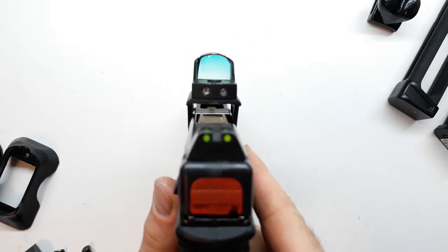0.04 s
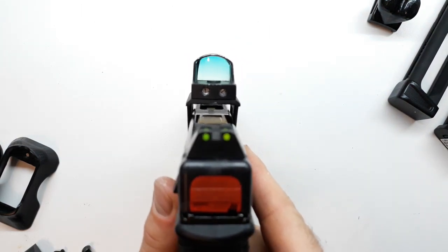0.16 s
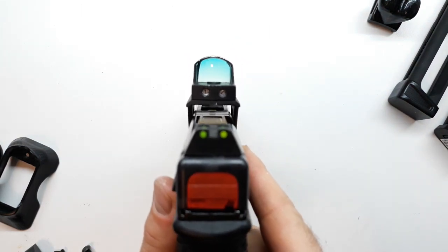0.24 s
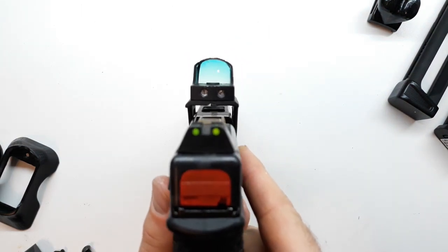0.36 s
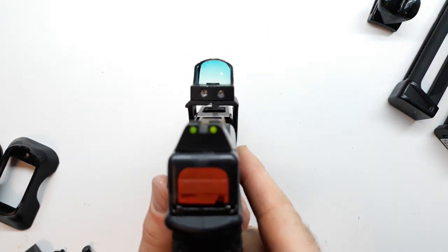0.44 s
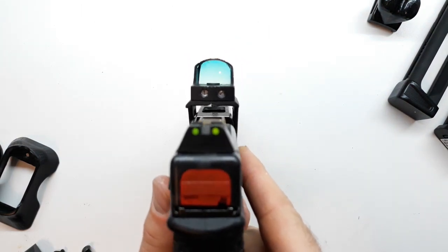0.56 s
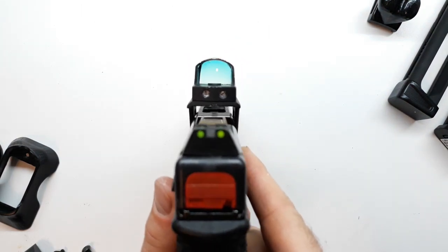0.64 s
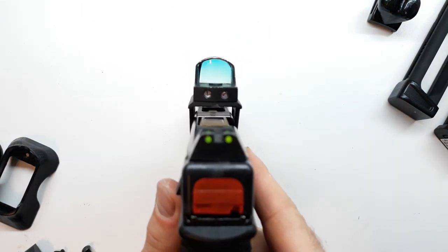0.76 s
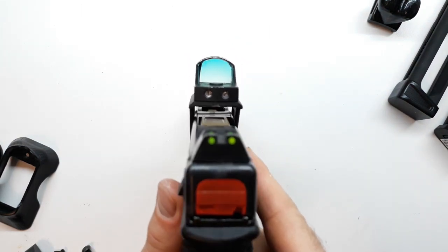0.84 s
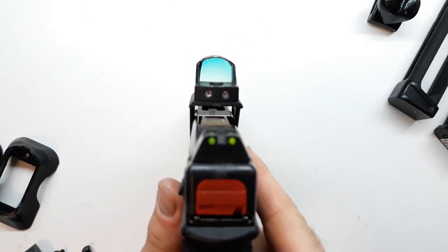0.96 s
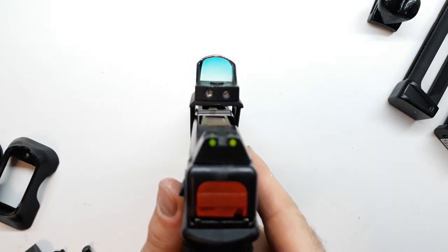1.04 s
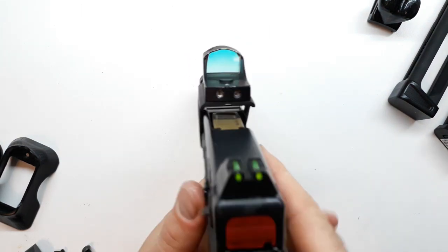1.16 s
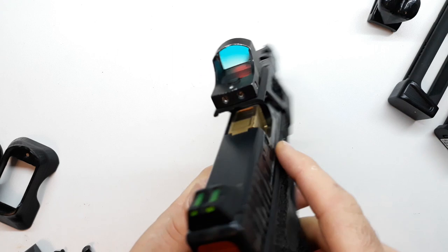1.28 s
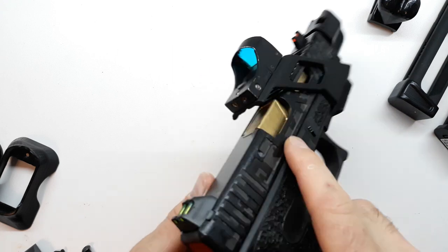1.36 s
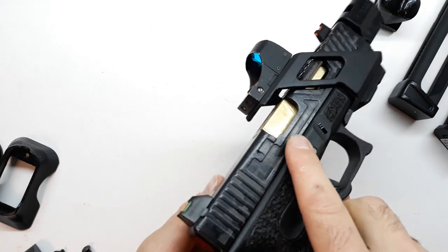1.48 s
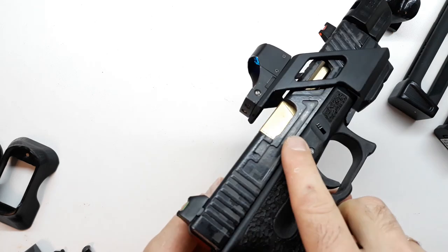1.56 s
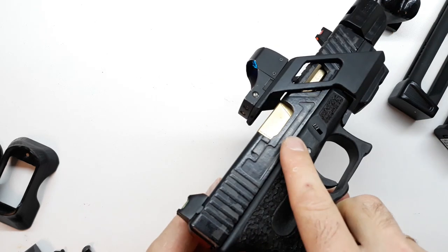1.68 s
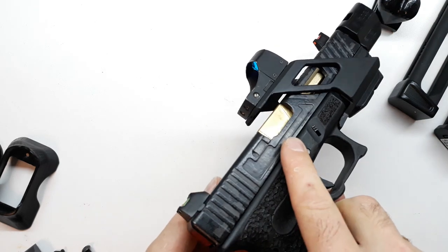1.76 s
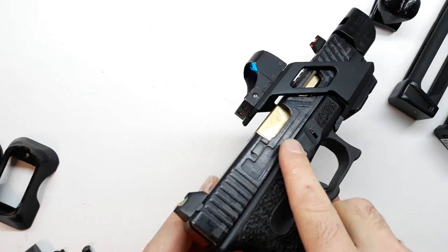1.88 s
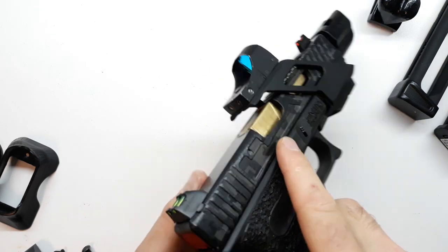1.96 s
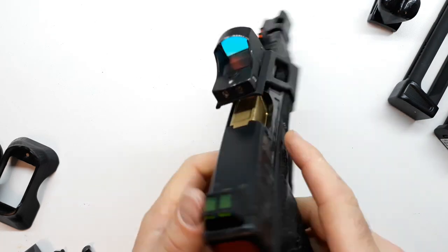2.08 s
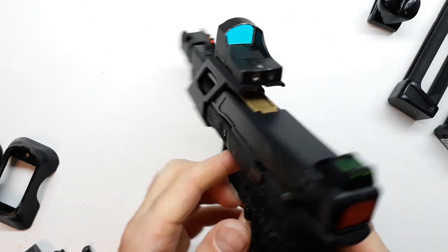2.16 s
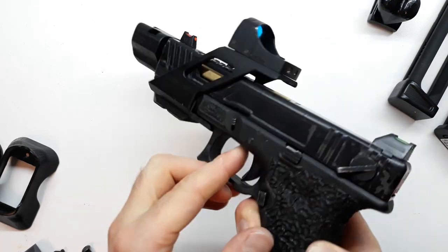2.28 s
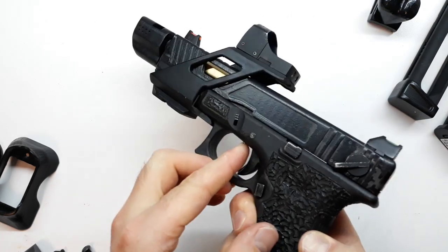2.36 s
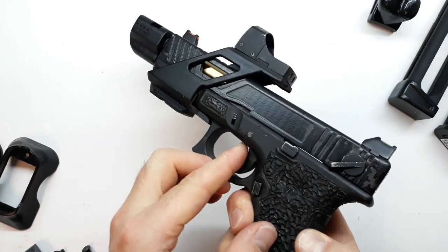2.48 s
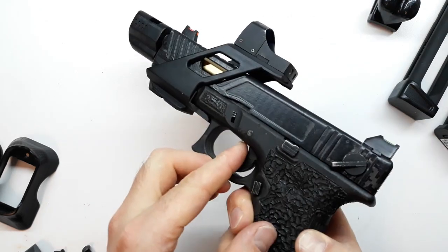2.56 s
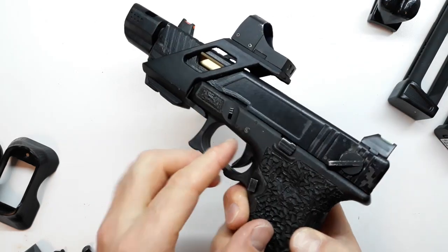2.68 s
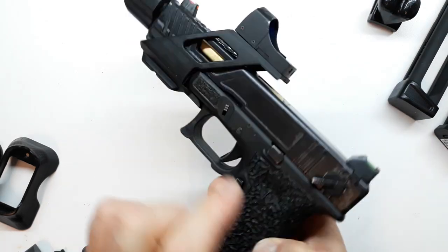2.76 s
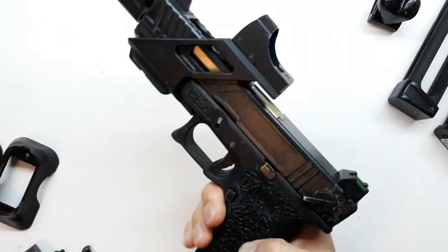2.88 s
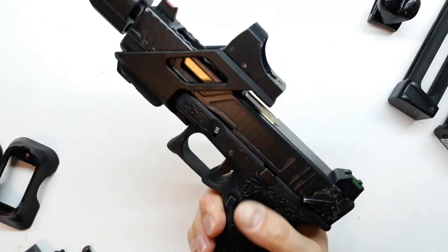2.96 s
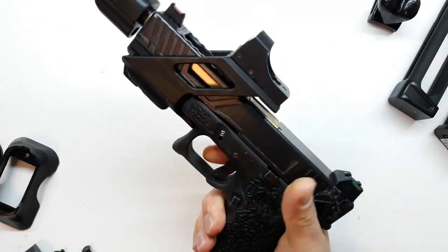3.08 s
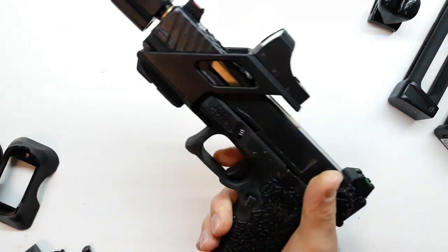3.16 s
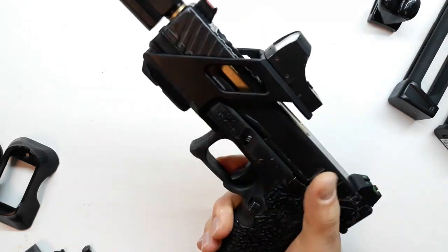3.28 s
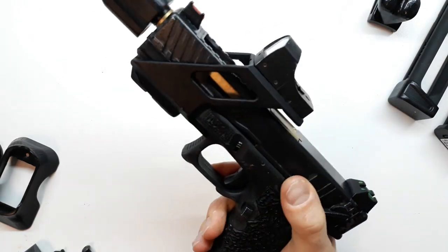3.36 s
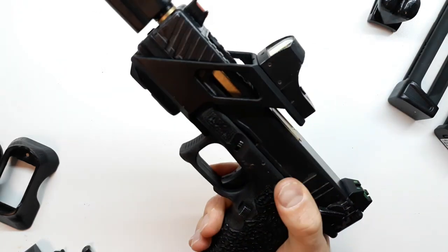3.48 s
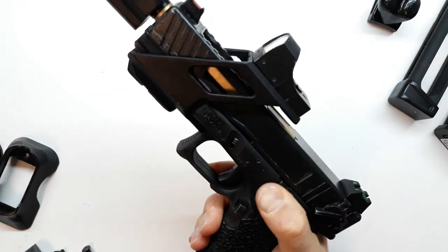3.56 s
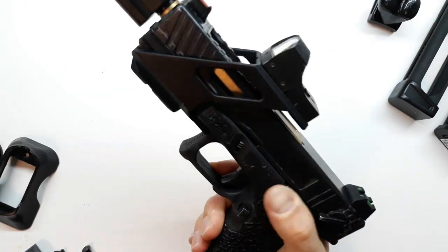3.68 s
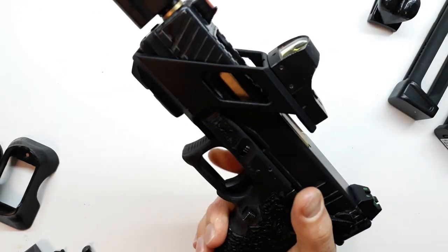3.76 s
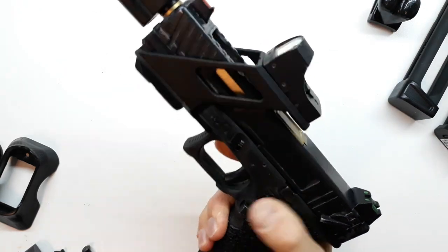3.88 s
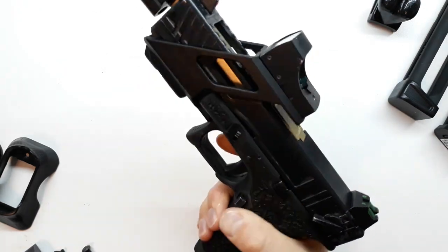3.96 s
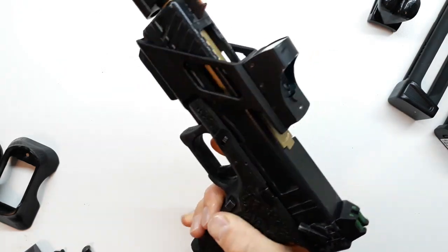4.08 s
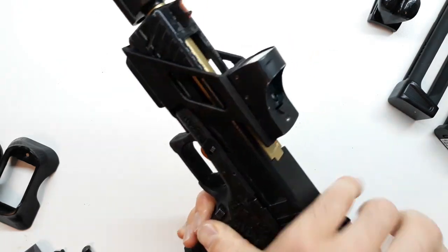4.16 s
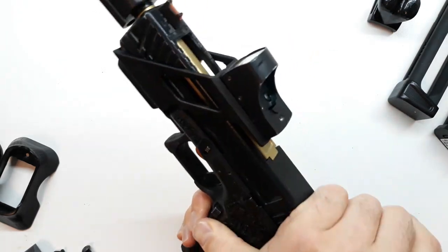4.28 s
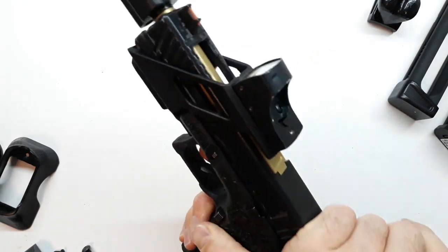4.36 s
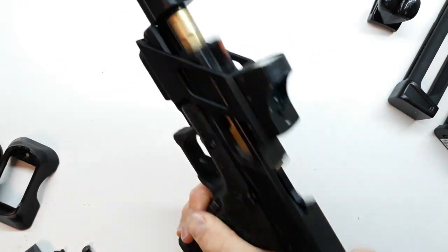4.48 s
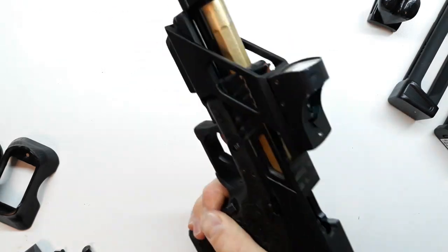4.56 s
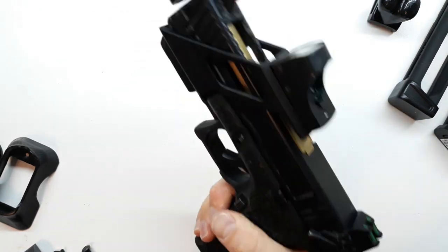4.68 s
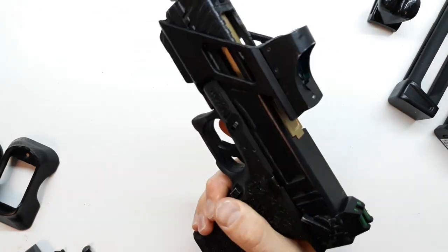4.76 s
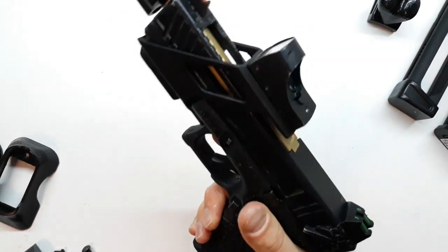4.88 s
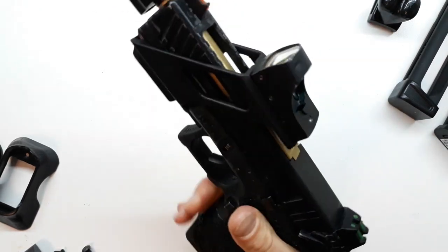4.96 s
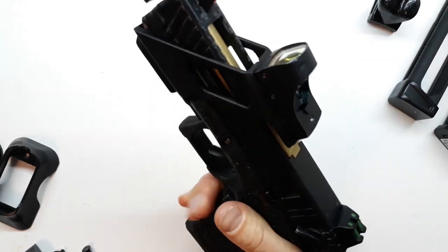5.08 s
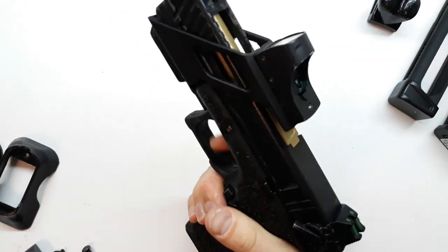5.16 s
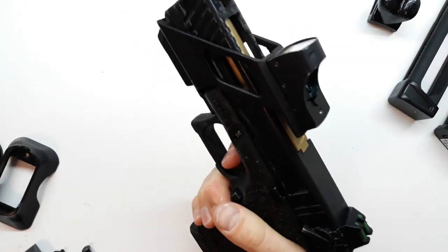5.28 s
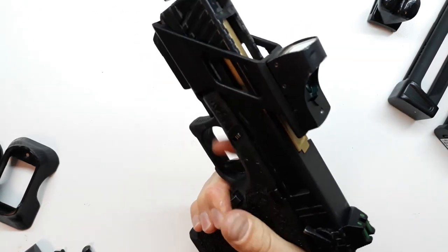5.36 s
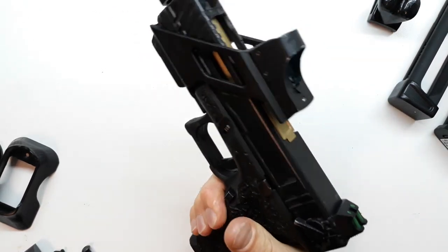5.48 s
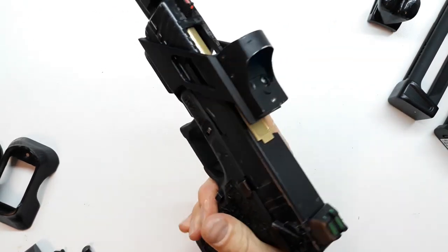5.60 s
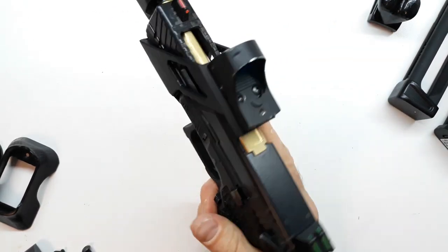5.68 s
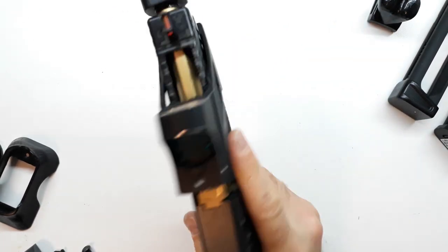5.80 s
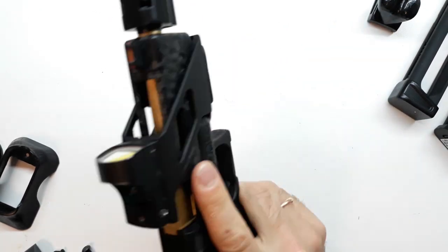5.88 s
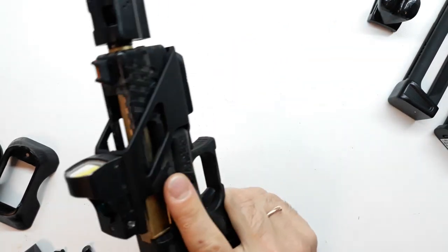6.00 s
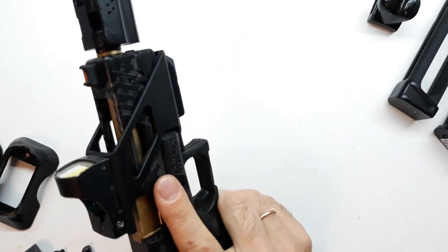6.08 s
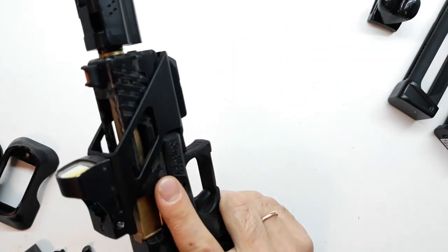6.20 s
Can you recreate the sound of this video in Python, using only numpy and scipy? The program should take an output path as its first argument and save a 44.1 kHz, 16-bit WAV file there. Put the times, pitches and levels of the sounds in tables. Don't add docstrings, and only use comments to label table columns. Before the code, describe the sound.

Close to the microphone in a bare, lively room, fingers rub and tick lightly on a pistol while a muffled engine speeds up outside over low traffic rumble and faint hiss. After four seconds the slide is racked in a very loud burst of metallic clacks, then slams home with a thump and short ringing echo. A sharp hammer click follows; the background drops lower and almost nothing else is heard.

```python
import sys
import numpy as np
from scipy import signal
from scipy.fft import rfft, irfft
from scipy.io import wavfile
from scipy.ndimage import uniform_filter1d, minimum_filter1d

SR = 44100
rng = np.random.default_rng(int(sys.argv[2]) if len(sys.argv) > 2 else 0)


def gain_from_decibels(decibels):
    exponent = np.asarray(decibels, float) / 20
    return 10 ** exponent


def inscribe(sig):
    pcm = np.round(np.clip(np.atleast_2d(sig).T, -1, 1) * 32767)
    wavfile.write(sys.argv[1], SR, pcm.astype(np.int16))


N = 274743

# (time [s], firing rate [Hz])
FIRING_RATE = [
    (0, 77),
    (2.2, 88.6),
    (3, 92.8),
    (3.4, 94.7),
    (4.2, 96.8),
    (5, 99.3),
    (6.23, 101.6),
]
# (time [s], load [dB])
ENGINE_LOAD = [
    (0, -24.5),
    (1.8, -19),
    (3.05, -18),
    (3.15, -3),
    (3.45, -2),
    (3.8, 1),
    (4.38, -2),
    (5.2, -5),
    (5.6, -14.5),
    (6.23, -13.5),
]
# (multiple of firing rate, level at full load and cruising speed [dB],
# share of the load's swing, gain with firing rate [dB/Hz])
ENGINE_ORDERS = [
    (1, -61.5, .05, 0.7),
    (2, -41.5, 1.15, -0.28),
    (3, -59.5, 2.5, 3.6),
    (4, -69.5, 0.9, 0.65),
]
# (time [s], level [dB], length [s])
UPPER_SWELLS = [(0.42, -57.5, 0.15), (0.682, -45, 0.086), (0.94, -43.5, 0.25), (1.093, -36, 0.12),
                (1.262, -40.5, 0.14), (1.444, -45, 0.047), (1.567, -46, 0.03), (1.72, -48, 0.12),
                (1.884, -43, 0.15), (2.015, -43, 0.087), (2.142, -38, 0.11), (2.292, -42.5, 0.066),
                (2.417, -41.5, 0.077), (2.568, -47.5, .065), (2.747, -46, 0.058), (2.984, -45, 0.18),
                (3.224, -46, 0.078), (3.396, -57, .1), (3.603, -47.5, 0.18), (3.88, -50.5, 0.079),
                (4.208, -62, 0.11), (5.041, -50.5, 0.42), (5.399, -52, .2), (5.761, -49.5, 0.41)]
# (time [s], level [dB], length [s])
LOWER_SWELLS = [(.08, -51.5, 0.068), (.95, -54.5, 0.13), (1.4, -56, 0.33), (1.752, -49.5, 0.1),
                (2.05, -39.5, 0.31), (2.454, -46.5, 0.13), (2.65, -51.5, 0.25), (2.986, -53, 0.065),
                (3.3, -56.5, 0.14), (4.1, -66, 0.38)]
# (time [s], level [dB], length [s])
DEEP_SWELLS = [
    (.12, -58, 0.073),
    (.63, -55, 0.19),
]
# (time [s], level [dB])
TRAFFIC_SWELLS = [
    (0, -67),
    (.64, -68.5),
    (1.1, -62.5),
    (1.63, -66.5),
    (2.16, -62),
    (2.6, -66),
    (4.3, -63.5),
    (5, -64),
    (6.23, -64.5),
]
# (frequency [Hz], density [dB per Hz])
RUMBLE_SPECTRUM = [(12, -60.5), (20, -31), (70, -13), (117, -9), (154, -6.5), (202, -11), (255, 2),
                   (280, -14.5), (317, -13.5), (665, -29.5), (1500, -42.5), (1950, -63.5), (3300, -120)]
# (frequency [Hz], density [dB per Hz])
HISS_SPECTRUM = [(410, -38.5), (700, -13), (1390, -6.5), (1610, -10), (2390, -10), (4340, -9.5),
                 (6450, -11.5), (9100, -19.5), (15000, -12.5), (15900, -15.5), (16500, -34)]
# (time [s], gain [dB])
SLOW_GAIN = [
    (0, -4.5),
    (4.38, -2),
    (4.42, 1),
    (4.7, -12.5),
    (5.2, -21.5),
    (5.26, -16),
    (6.23, -18.5),
]
# (frequency [Hz], T60 [s])
ROOM_DECAY = [(300, 0.62), (900, 0.26), (2000, 0.45), (3000, 0.41), (6000, 0.41), (9000, 0.34),
              (14000, 0.15)]
# (time [s], level [dB], frequency [Hz], T60 [s])
AIR_THUMPS = [
    (4.384, -41.5, 148.6, 0.064),
    (4.506, -11.5, 104.7, 0.0081),
    (4.670, -2, 106.1, 0.027),
    (5.244, -37.5, 131, 0.028),
]
# (start [s], length [s], level [dB], lows above that [dB])
STROKES = [(0.855, 0.17, -79, -12), (1.326, .15, -67, -20), (1.86, 0.27, -82, -2),
           (2.114, 0.078, -65.5, -14), (2.224, 0.044, -68.5, -7), (2.715, 0.54, -68, -5.5),
           (2.958, 0.027, -58, -1.5), (3.0, 0.03, -86, -10), (3.065, 0.056, -75, -16),
           (3.2, 0.083, -67.5, -17), (3.34, 0.11, -72, 4), (3.59, .06, -70.5, -12), (3.76, .1, -75, -3),
           (3.879, 0.098, -60.5, -10), (4.24, 0.035, -67.5, 3), (4.345, 0.011, -74, 4.5),
           (4.401, 0.022, -17, 1), (4.45, .11, -23, 3.5), (4.635, 0.052, -40.5, -11.5),
           (5.135, .03, -74, -1.5), (5.85, .1, -88.5, -5.5), (6.168, .04, -80, -17)]
# (time [s], peak at 2.5-8 kHz [dB], lows above that [dB], strongest ring [Hz])
LIGHT_TICKS = [(1.1964, -30.5, -8.5, 3980), (1.2528, -17, -13, 2800), (1.264, -31, -12, 5000),
               (1.53, -57, -21, 2980), (2.111, -46.5, -14, 3050), (2.298, -47, 4, 4900),
               (2.304, -33, -14, 2170), (2.842, -45, -8, 1610), (3.166, -28, -7.5, 2210),
               (3.22, -40, -14, 5660), (3.321, -44.5, -21, 5500), (3.338, -49.5, 2.5, 2270),
               (3.398, -50, 2, 1820), (3.698, -39, -1, 1290), (3.738, -22, -20, 3600),
               (3.8314, -29.5, -4.5, 3800), (3.895, -42.5, 0.5, 2640), (4.2224, -25, -2.5, 3340),
               (4.3262, -30.5, -4, 2030), (5.14, -53, -18, 3420), (5.675, -62, -6, 4394),
               (5.855, -64, -17, 3700), (6.17, -58, -22.5, 5820)]
# (time [s], peak at 2.5-8 kHz [dB], highs above that [dB], rattle T60 [s], strongest ring [Hz])
METAL_CLACKS = [(1.302, -52, 6, 0.0061, 6600), (3.707, -26.5, -7, 0.013, 6420),
                (3.724, -13.5, -18.5, 0.014, 5080), (4.379, -29.5, -25, 0.099, 4000),
                (4.384, 1.5, -15.5, 0.039, 4260), (4.392, 1.5, -23, 0.033, 3660),
                (4.409, -5.5, -23, 0.065, 3770), (4.428, -2.5, -13.5, 0.019, 3770),
                (4.4421, -0.5, -7, .015, 2880), (4.466, 3.5, -13, 0.009, 5660),
                (4.4845, 8, -10.5, 0.026, 3660), (4.495, 6, -16.5, 0.015, 2567),
                (4.5063, 4, -13.5, 0.018, 4975), (4.519, -0.5, -19.5, 0.016, 3660),
                (4.531, -6, -18.5, 0.03, 5020), (4.65, -14, -16, 0.06, 1710),
                (4.663, -17, -7.5, .008, 6350), (4.669, -3.5, -16.5, 0.11, 5770),
                (4.6715, 1.5, -5, 0.13, 6600), (4.676, -1, -13.5, 0.13, 2530),
                (5.2036, -31, -22, 0.014, 5000), (5.2408, -5, -10, 0.008, 3390),
                (5.2418, 2.5, -13.5, 0.018, 1720), (5.246, -1.5, -23.5, 0.012, 4170)]
# (frequency [Hz], T60 [s])
SLIDE_MODES = [(1266, 0.007), (1720, 0.006), (2100, 0.025), (2600, 0.029), (3060, 0.0077), (3660, 0.0034),
               (4090, 0.032), (4975, .025), (5480, 0.016), (6350, 0.033), (7050, 0.035)]
# (frequency [Hz], density [dB per Hz])
PISTOL_SPECTRUM = [(240, -51.5), (400, -23), (818, -14.5), (1250, -6), (1430, -10.5), (1670, -7.5),
                   (3030, -6.5), (4900, -5), (7230, -6.5), (9870, -22.5), (15000, -10), (15700, -25),
                   (16500, -40)]

CRUISE_HZ, HISS_DB = 96, -73
UPPER_HZ, LOWER_HZ, DEEP_HZ, BOOM_WANDER_HZ = 252.5, 159.5, 110, 1.6
RUB_ATTACK_S, RUB_RELEASE_S, RUB_FADE_DB = 0.016, 0.025, 5.5
RUB_EDGE_HZ = 3100
TICK_HIGHS_DB, TICK_RATTLE_S, TICK_CUT_HZ = -38, 0.013, 5100
CLACK_LOWS_DB, LOWS_DB_PER_OCTAVE = -8.0, 2
NEAR_CUT_HZ = 1200
THUMP_ROOM_DB, THUMP_ROOM_HZ = -13, 674


def in_time(rows):
    s, *columns = np.transpose(rows)
    return [np.interp(np.arange(N) / SR, s, column) for column in columns]


def at_hz(points, hz):
    table_hz, values = np.transpose(points)
    return np.interp(np.log(hz + 1), np.log(table_hz), values)


def rms_one(x):
    return x / np.sqrt(np.mean(x ** 2) + 1e-20)


def cut(x, hz, kind, order=2):
    return signal.sosfilt(signal.butter(order, hz, kind, fs=SR, output="sos"), x)


def colour(x, spectrum):
    size = 8192
    level_db = np.maximum(at_hz(spectrum, np.fft.rfftfreq(size, 1 / SR)), -90)
    cepstrum = irfft(np.log(gain_from_decibels(level_db)))
    cepstrum[1:size // 2] *= 2
    cepstrum[size // 2 + 1:] = 0
    impulse = rms_one(irfft(np.exp(rfft(cepstrum)))) / np.sqrt(size)
    return signal.fftconvolve(x, impulse)[:len(x)]


def drift(rate):
    return rms_one(cut(rng.standard_normal(N + SR), rate, "low")[SR:])


def ring(x, hz, t60):
    radius = gain_from_decibels(-60 / (t60 * SR))
    angle = 2 * np.pi * hz / SR
    feedback = [1, -2 * radius * np.cos(angle), radius * radius]
    return signal.lfilter([0, np.sin(angle)], feedback, x + 1e-18)


def split(x, low_gain, high_gain, edge_hz=2400):
    def twice(v, hz, kind):
        return cut(cut(v, hz, kind, order=4), hz, kind, order=4)

    lows = twice(x, edge_hz, "low")
    rest = twice(x, edge_hz, "high")
    return low_gain * lows + twice(rest, 8500, "low") + high_gain * twice(rest, 8500, "high")


def room(x):
    t, tail = np.arange(SR * 3 // 4) / SR, 0
    edges = 200 * 2 ** np.arange(0, 6.6, 0.5)
    white = rng.standard_normal((2, len(t)))
    for k, (low, high) in enumerate(zip(edges, edges[1:])):
        t60 = at_hz(ROOM_DECAY, np.sqrt(low * high))
        tail = tail + cut(white[k % 2], [low, high], "band") * gain_from_decibels(-60 * t / t60)
    tail = tail * (1 - np.exp(-t / 0.0024))
    return signal.fftconvolve(x, tail / np.sqrt(np.sum(tail ** 2)))[:N]


def hiss():
    return gain_from_decibels(HISS_DB) * colour(rng.standard_normal(N), HISS_SPECTRUM)


def traffic():
    level_db = in_time(TRAFFIC_SWELLS)[0] + 11.0 + 0.54 * drift(2.3)
    return gain_from_decibels(level_db) * colour(rng.standard_normal(N), RUMBLE_SPECTRUM)


def tone(hz, db):
    level = np.sqrt(2) * gain_from_decibels(db + 0.59 * drift(4.7))
    phase = 2 * np.pi * np.cumsum(hz) / SR + 0.14 * drift(1.8)
    return level * np.sin(phase)


def boom(hz, swells):
    t, power = np.arange(N) / SR, 0
    for s, db, length in swells:
        power = power + gain_from_decibels(2 * db) * np.exp(-8 * np.log(2) * ((t - s) / length) ** 2)
    return np.sqrt(power) * tone(hz + BOOM_WANDER_HZ * drift(8.8), 0)


def engine():
    firing_hz, load_db = in_time(FIRING_RATE)[0], in_time(ENGINE_LOAD)[0]
    out = np.zeros(N)
    for multiple, db, share, per_hz in ENGINE_ORDERS:
        level_db = db + share * load_db + per_hz * (firing_hz - CRUISE_HZ) + 1.7 * drift(0.5)
        out += tone(round(multiple) * firing_hz, level_db)
    return out + boom(UPPER_HZ, UPPER_SWELLS) + boom(LOWER_HZ, LOWER_SWELLS) + boom(DEEP_HZ, DEEP_SWELLS)


def background():
    return gain_from_decibels(in_time(SLOW_GAIN)[0]) * (engine() + traffic() + hiss())


def thumps():
    out = np.zeros(N)
    for s, db, hz, t60 in AIR_THUMPS:
        t = np.arange(N - round(s * SR)) / SR
        onset = 1 - np.exp(-t / 0.00022)
        out[-len(t):] -= gain_from_decibels(db - 60 * t / t60) * np.cos(2 * np.pi * hz * t) * onset
    return out


def rubbing():
    grains = rng.standard_normal(N)
    unevenness_db = 3 * np.minimum(rng.exponential(1, N), 3.5) + 2.5 * drift(90)
    grains = rms_one(grains * gain_from_decibels(unevenness_db))
    parts, t = np.zeros((3, N)), np.arange(N) / SR
    for s, length, db, low_db in STROKES:
        corners = [s - RUB_ATTACK_S, s, s + length, s + length + RUB_RELEASE_S]
        on = np.interp(t, corners, [0, 1, gain_from_decibels(-RUB_FADE_DB), 0])
        weights = np.array([[1], [gain_from_decibels(low_db)], [gain_from_decibels(0.3 * db + 0.5)]])
        parts += on * gain_from_decibels(db + 1.5) * weights
    level = parts[0] + 1e-12
    return level * split(grains, parts[1] / level, parts[2] / level, RUB_EDGE_HZ)


def contacts(table):
    t = np.arange(4096) / SR
    out = np.zeros((2, N + len(t)))
    grits = rng.standard_normal((len(table), len(t)))
    spread = rng.standard_normal((len(table), len(SLIDE_MODES)))
    for (s, db, low_db, high_db, t60, spot_hz), grit, luck in zip(table, grits, spread):
        rattle = grit * gain_from_decibels(-60 * t / np.clip(t60, 0.002, 0.09))
        rattle[0] = 5.3
        burst = np.zeros((2, len(t)))
        burst[1, 0] = np.sqrt(np.sum(rattle ** 2))
        burst[0] = rattle + gain_from_decibels(-28.0) * ring(rattle, spot_hz, 0.018)
        burst[1] += gain_from_decibels(-17) * ring(burst[1], spot_hz, 0.003)
        for (hz, ring_t60), chance in zip(SLIDE_MODES, luck):
            octaves_away = abs(np.log2(hz / spot_hz))
            mode_db = -29.5 - 8.0 * octaves_away + 2 * np.clip(chance, -1, 1)
            burst[0] += gain_from_decibels(mode_db) * ring(rattle, hz, ring_t60)
        at = round(s * SR)
        out[:, at:at + len(t)] += gain_from_decibels(db - 10) * split(burst, gain_from_decibels(low_db + 4), gain_from_decibels(high_db + 8))
    return out[:, :N]


def handling():
    ticks = contacts([(s, db, low_db, TICK_HIGHS_DB, TICK_RATTLE_S, hz) for s, db, low_db, hz in LIGHT_TICKS])
    ticks = cut(ticks, TICK_CUT_HZ, "low")
    rub = rubbing()
    return cut(ticks[0] + rub, NEAR_CUT_HZ, "high") + room(gain_from_decibels(-5.0) * ticks[1] + gain_from_decibels(-6.0) * rub)


def slide_clacks(spots=3):
    clacks, out = [], np.zeros(N)
    for s, db, high_db, t60, hz in METAL_CLACKS:
        low_db = CLACK_LOWS_DB - LOWS_DB_PER_OCTAVE * np.log2(hz / 3700)
        clacks.append((s, db, low_db, high_db, t60, hz))
    for first in range(spots):
        near, radiated = contacts(clacks[first::spots])
        out += cut(near, NEAR_CUT_HZ, "high", order=4) + gain_from_decibels(-6.0) * room(radiated)
    return out


def pistol():
    return cut(colour(handling() + slide_clacks(), PISTOL_SPECTRUM), 780, "high", order=3)


def scene():
    gun, floor, push = pistol(), background(), thumps()
    push = push + gain_from_decibels(THUMP_ROOM_DB) * room(cut(push, THUMP_ROOM_HZ, "high", order=3))
    return (gun + cut(push + floor, 33, "high"))[None]


def roll_off(x):
    return signal.sosfilt(signal.butter(12, 16820, fs=SR, output="sos"), x)


def record(dry):
    recovered_db = 260 * np.arange(N) / SR
    over_db = np.maximum(20 * np.log10(np.abs(dry[0]) + 1e-9) + 1.8, 0)
    held_db = np.maximum.accumulate(over_db + recovered_db) - recovered_db
    ahead_db = -minimum_filter1d(-held_db, size=400)
    gain = gain_from_decibels(-uniform_filter1d(ahead_db, size=130))
    mix = cut(dry * gain, 16200, "low", order=12)
    return roll_off(mix)


dry = scene()
out = record(dry)
inscribe(out)
```